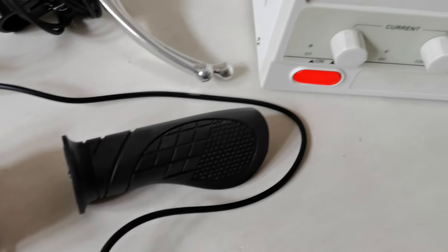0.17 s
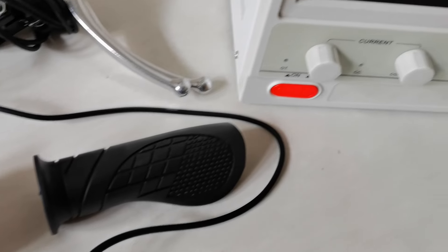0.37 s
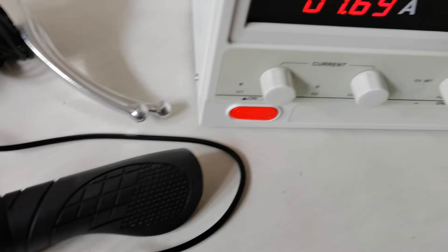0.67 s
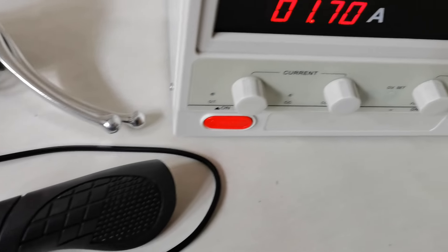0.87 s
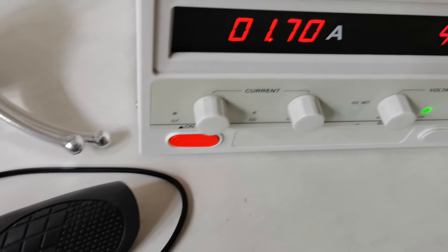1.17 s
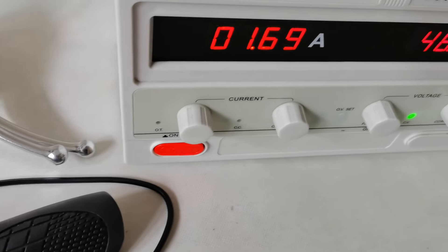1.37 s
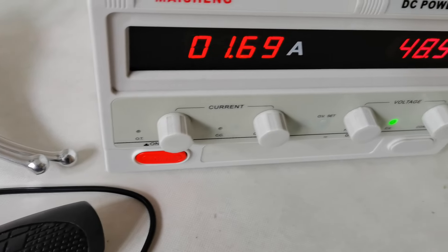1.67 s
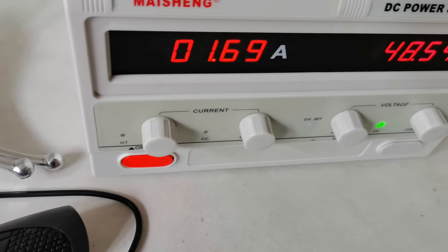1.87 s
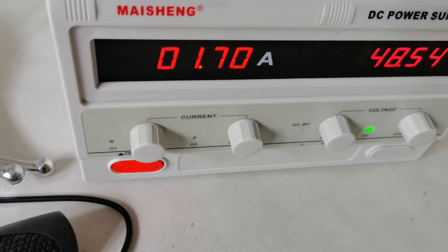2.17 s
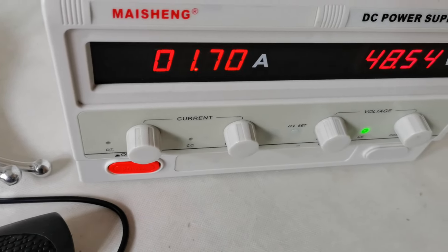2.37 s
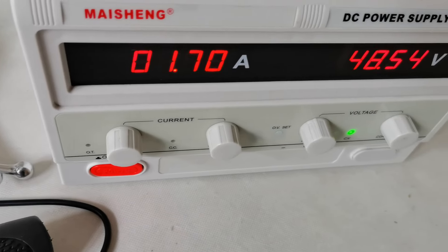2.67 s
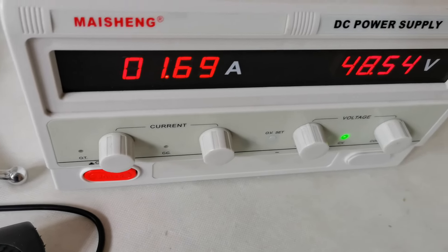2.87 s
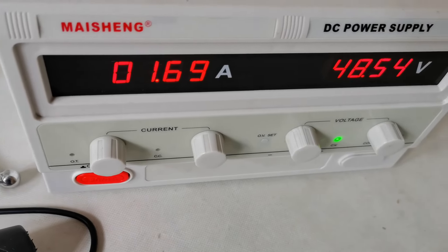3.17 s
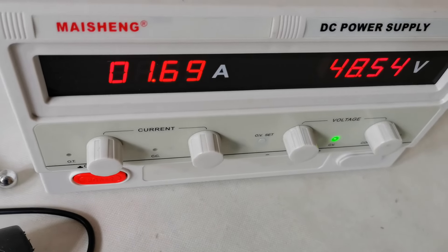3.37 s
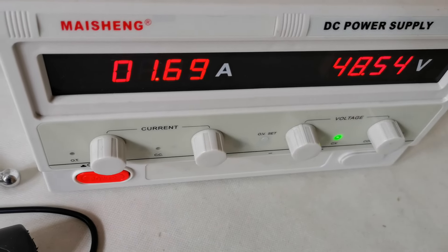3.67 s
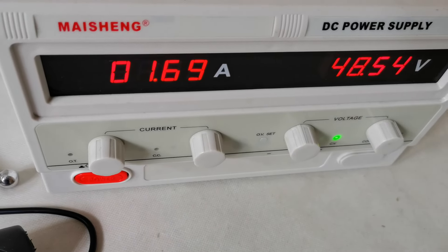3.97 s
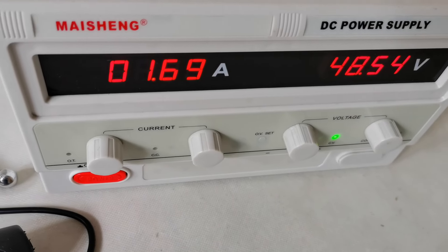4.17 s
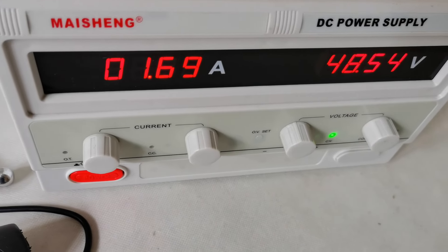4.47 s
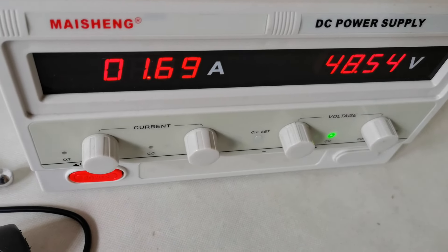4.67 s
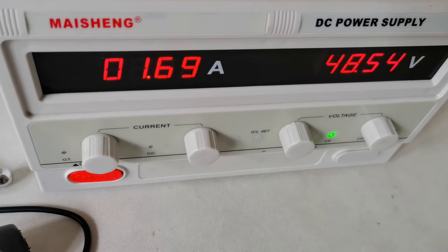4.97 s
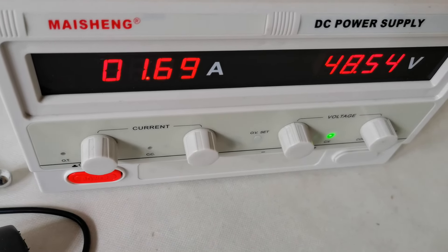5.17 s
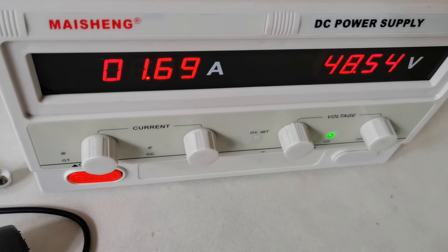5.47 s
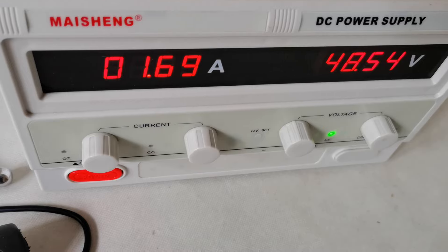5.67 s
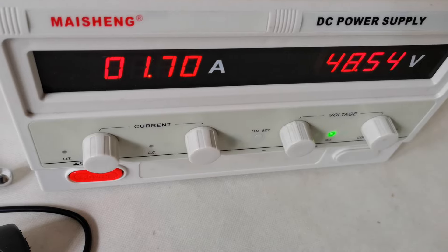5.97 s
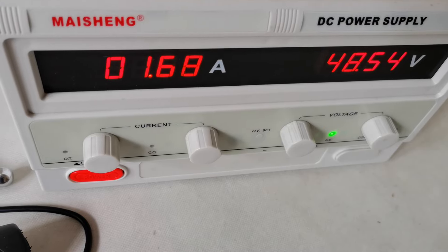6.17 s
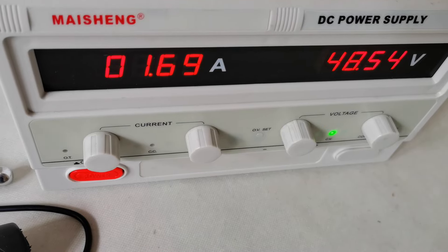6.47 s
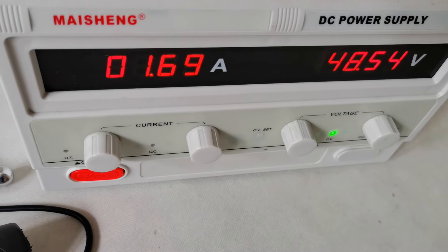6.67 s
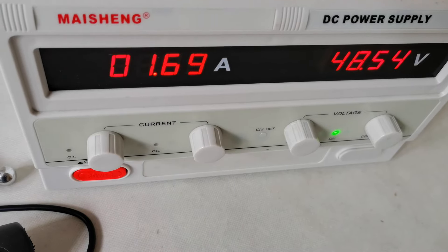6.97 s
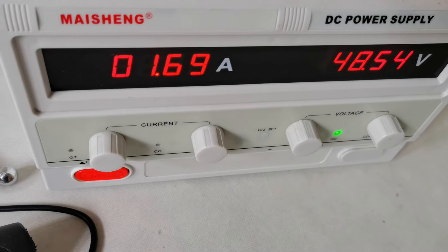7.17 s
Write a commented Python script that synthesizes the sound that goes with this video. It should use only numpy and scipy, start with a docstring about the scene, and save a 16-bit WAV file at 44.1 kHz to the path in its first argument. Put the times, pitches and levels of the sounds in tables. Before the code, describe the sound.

From 0 seconds a brushless hub motor is already running at full, unchanging speed on a bench indoors, left of the handheld stereo microphone. A piercing whine near 8.6 kHz sits over a stack of thinner buzzing tones from roughly 400 Hz upward, many around 1 to 4 kHz. The high whine throbs about 9.4 times a second, once per turn, its depth wavering slightly. Bearings add fuzzy, grainy tones and fine hiss; moving air and the bench make a broad rush mostly below 2 kHz. From 0 to about 3.1 seconds the microphone swings, gently changing timbre and stereo balance. At about 1.7 seconds a very short, soft low knock lands on the microphone body. From 3.1 until the end near 7.4 seconds the position is fixed: the same whine, flutter, hiss and rush persist, brighter on the left, without slowing or stopping.

```python
"""Hub motor on a bench

A brushless hub motor with 46 magnet poles runs at a steady speed on a bench, off to the left.
Its whine is a set of whole shaft orders that throbs once a turn; the bearings add fuzzy tones and hiss,
moving air and the bench a broad low rush. The hand-held stereo microphone swings round for three
seconds, then rests; during the swing a soft low knock lands on its body."""
import sys
import numpy as np
from scipy import signal
from scipy.fft import rfft, irfft, next_fast_len
from scipy.io import wavfile
from scipy.ndimage import map_coordinates

SR = 44100
rng = np.random.default_rng(int(sys.argv[2]) if len(sys.argv) > 2 else 0)


def decibels_to_gain(level_db):
    """Convert a level in decibels to a linear amplitude gain (20 dB per decade)."""
    exponent = np.asarray(level_db, float) / 20
    return 10 ** exponent


def waveform_to_disk(signal):
    """Save audio, clipped to [-1, 1], as 16-bit WAV at the path in sys.argv[1]."""
    frames = np.transpose(np.atleast_2d(signal))
    scaled = np.clip(frames, -1, 1) * 32767
    samples = np.round(scaled).astype(np.int16)
    wavfile.write(sys.argv[1], SR, samples)


N = 322812
POLES = 46
LEFT_LEAD_S = 0.0003856  # the left port is nearer the motor; the swing shortens this at first


def read(points, hz):
    """Columns of a table at hz, joined on a log-frequency axis."""
    table_hz, *columns = np.transpose(points)
    return np.array([np.interp(np.log(hz + 1), np.log(table_hz + 1), column) for column in columns])


def wander(top_hz):
    """Slow chance of rms 1: white noise low-passed at top_hz, with one second of run-in dropped."""
    lowpass = signal.butter(2, top_hz, fs=SR, output="sos")
    slow = signal.sosfilt(lowpass, rng.standard_normal(N + SR))[SR:]
    return slow / slow.std()


# Rotor speed on the bench: (time [s], speed [turns/s])
SPEED = [(0.7, 9.399), (1.7, 9.3982), (2.6, 9.3978), (3.6, 9.3986), (6.7, 9.3984)]


def turns():
    """Rotor angle in turns, the running sum of speed; zero at one early moment when the loud side
    faces the microphone."""
    loud_side_s = 0.128
    angle = np.cumsum(np.interp(np.arange(N) / SR, *np.transpose(SPEED))) / SR
    return angle - np.interp(loud_side_s * SR, np.arange(N), angle)


# How alike the two ports hear the noise: (frequency [Hz], likeness [0 to 1])
LIKENESS = [(30, .25), (60, 0.81), (120, 0.96), (250, 0.95), (500, 0.78), (900, 0.58), (1500, 0.8),
            (2100, 0.23), (3000, 0.19), (4500, 0.33), (6000, 0.084), (7200, 0.47), (8000, 0.31),
            (15000, 0.14)]


def noise(colour):
    """Two partly alike channels of noise with the given density; the shared part reaches the right later."""
    size = next_fast_len(N)
    hz = np.fft.rfftfreq(size, 1 / SR)
    left, other = rfft(rng.standard_normal((2, size)))
    same = np.clip(read(LIKENESS, hz)[0], 0, 1)
    late_left = left * np.exp(-2j * np.pi * hz * LEFT_LEAD_S)
    right = same * late_left + np.sqrt(1 - same ** 2) * other
    return irfft([left, right] * colour(hz) * np.sqrt(SR / 2), size)[:, :N]


# Moving air and bench rumble, before the swing colours them:
# (frequency [Hz], left density [dB per Hz], right density [dB per Hz])
RUSH = [(30, -86, -84), (45, -76, -77), (68.5, -70, -74.5), (101, -76, -77.5), (210, -71, -71.5),
        (316, -77.5, -76.5), (375, -69.5, -72.5), (553, -74.5, -70.5), (578.4, -59, -64.5),
        (860, -57.5, -58.5), (968, -73.5, -70), (1364, -71.5, -66.5), (1510, -64, -65), (1992, -74, -68),
        (2356, -76, -81.5), (2960, -84, -86)]


def rush():
    """Broad low noise of moving air and bench, whose level wanders a little."""
    swell_db, swell_hz = 0.29, 1.6  # rms, top rate
    low = noise(lambda hz: decibels_to_gain(read(RUSH, hz)) * (hz > 18) * (hz < RUSH[-1][0]))
    return low * decibels_to_gain(swell_db * wander(swell_hz))


# Knock on the microphone body: (start [s], left envelope peak [dB], frequency [Hz], length [s])
THUMP = [(1.696, -30, 50, 0.043)]


def thump():
    """A soft low knock on the microphone body: a sine under a smooth hump, weaker at the right port."""
    out = np.zeros(N)
    for start_s, db, hz, length_s in THUMP:
        t = np.arange(0, length_s, 1 / SR)
        knock = np.hanning(len(t)) * np.sin(2 * np.pi * hz * (t - length_s / 2))
        out[round(start_s * SR):][:len(t)] += decibels_to_gain(db) * knock
    return out * decibels_to_gain([[0], [-6]])


# Colour of the hub shell on the pole harmonics, before the swing; also the hiss density:
# (frequency [Hz], left density [dB per Hz], right density [dB per Hz])
SHELL = [(2318, -72, -73.5), (3000, -74.5, -79.5), (3780, -80.5, -73.5), (4270, -72, -84.5),
         (5003, -85, -77), (4770, -95, -95), (5350, -100, -101), (5753, -74, -77), (6200, -79.5, -109),
         (6620, -78.5, -98), (7110, -62, -65.5), (7240, -68.5, -58.5), (7590, -83, -94), (8705, -71, -96),
         (8580, -55, -69), (9400, -78, -88), (10400, -98, -90), (10350, -85, -86), (11600, -77.5, -86),
         (13400, -97.5, -92), (14000, -80.5, -84.5), (15100, -90.5, -94)]
# Valleys between the pole harmonics: (frequency [Hz], depth [dB])
VALLEYS = [(2800, 5.5), (3300, 8.5), (3700, 10), (4100, 9), (4500, 14), (5000, 10), (5700, 14.5),
           (6500, 3.5)]


def shell(hz):
    """Colour of the hub shell in dB, with a valley halfway between each two pole harmonics."""
    between = np.sin(np.pi * hz / (POLES * SPEED[-1][1])) ** 4
    return read(SHELL, hz) - read(VALLEYS, hz) * between


def hiss():
    """Bearing hiss through the hub shell: noise with the shell's colour, above the rush."""
    return noise(lambda hz: decibels_to_gain(shell(hz)) * (hz >= RUSH[-1][0]))


# Balls passing one spot of the race, before the swing:
# (order [per shaft turn], left level [dB], right level [dB], left lead [radians])
BALL_PASSES = [(7.5, -60.5, -60, -0.66), (15.21, -61, -61, 0.2)]
# Shifts of a pole tone by the rolling balls: (shift [shaft orders])
BALL_OFFSETS = [7.4, -8.22, 14.75, -14.21]
# Level for each of those shifts, over the shell colour: (level [dB])
BALL_SIDE_DB = [15.3, 12.4, 11, 9.9]
# Added level for each shifted pole multiple, from the 15th up: (level [dB])
BALL_POLE_DB = [-3, 4, -2, 0, 8, 1, -9]


def ball_tones():
    """The ball passes, and each high pole tone shifted by the balls, coloured by the shell."""
    rows = list(BALL_PASSES)
    for multiple, pole_db in enumerate(BALL_POLE_DB, start=15):
        for offset, side_db in zip(BALL_OFFSETS, BALL_SIDE_DB):
            order = multiple * POLES + offset
            hz = order * SPEED[-1][1]
            left_db, right_db = shell(hz) + side_db + pole_db
            rows.append((order, left_db, right_db, 2 * np.pi * hz * LEFT_LEAD_S))
    return rows


def balls(angle):
    """Each tone is narrow noise around its order, as the balls slip in the races."""
    width_hz, hop = 13, 64  # resonance width, samples between slip values
    decay = np.exp(-np.pi * width_hz / SR) ** hop
    two_poles = np.convolve([1, -decay], [1, -decay])
    out = np.zeros((2, N))
    for order, left_db, right_db, lead in ball_tones():
        count = N // hop + 2
        slip = rng.standard_normal(count) + 1j * rng.standard_normal(count)
        slip = signal.lfilter([1], two_poles, slip)
        slip = np.interp(np.arange(N) / hop, np.arange(count), slip / slip.std())
        tone = np.sqrt(2) * slip * np.exp(2j * np.pi * order * angle)
        out += decibels_to_gain([[left_db], [right_db]]) * [tone.real, (tone * np.exp(-1j * lead)).real]
    return out


# Parts of the shell's ring that point one way and sweep round:
# (from [Hz], to [Hz], swell up and down [dB], delay after the loud side [turns])
SWEEPS = [(6830, 7170, 5.5, 0.53), (8600, 9600, 2.5, 0.012)]


def sweep(x, angle):
    """Each pointing band is louder as its side of the rotor comes round."""
    size = next_fast_len(N)
    hz = np.fft.rfftfreq(size, 1 / SR)
    spectrum, out = rfft(x, size), x.copy()
    for low_hz, high_hz, swell_db, late in SWEEPS:
        band = irfft(spectrum * ((hz > low_hz) & (hz < high_hz)), size)[:, :N]
        gain = decibels_to_gain(swell_db * np.cos(2 * np.pi * (angle - late)))
        out += band * (gain - 1)
    return out


# Magnets passing, halves from unequal magnet pairs; levels before the swing:
# (multiple [of the pole count], left level [dB rms], right level [dB rms], left lead [radians],
# next order either side [dB over the tone])
POLE_TONES = [(1, -54, -57, 1.0, -20), (5, -67, -61, 3.1, -15), (6, -45, -47, -0.1, -13),
              (7, -52, -53, 2.3, -15), (8, -44, -48, 1.8, -20), (9, -48, -49, -2.2, -17),
              (10, -47, -48, 1.1, -16), (11, -52, -59, 0.1, -16), (13, -69, -68, 0.5, -2),
              (14, -56, -66, -2.3, -18), (15, -60, -73, -0.6, -15), (16, -44, -56, -0.7, -12),
              (17, -47, -45, 1.5, -12), (18, -55, -68, 0.4, -8), (19, -56, -67, -2.7, -8),
              (20, -32, -52, -2.6, -19), (21, -53, -80, -2.9, -13), (22, -63, -81, -1.8, -12),
              (23, -74, -70, -0.6, -12), (27, -62, -66, -1.2, -15), (7.5, -63, -58, 2.9, -15),
              (13.5, -61, -65, -1.9, -15), (15.5, -57, -61, -1.1, -15), (17.5, -59, -62, -1.1, -3),
              (18.5, -53, -76, 1.3, -10), (19.5, -59, -85, 3.0, -12), (20.5, -55, -73, -2.0, -10),
              (21.5, -60, -87, -2.5, -10), (25.5, -61, -65, 1.6, -10), (26.5, -62, -74, 0.4, -10)]
# Other strong shaft orders: some likely from the stator slots, some neighbours of pole harmonics;
# levels before the swing:
# (order [per shaft turn], left level [dB rms], right level [dB rms], left lead [radians],
# next order either side [dB over the tone])
OTHER_TONES = [(22, -60, -60, 0.5, -20), (101, -49, -44, 2.5, -20), (103, -41, -42, 2.0, -10),
               (152, -52, -57, -3.1, -20), (154, -49, -51, 2.7, -20), (178, -52, -46, -1.8, -9),
               (190, -53, -57, 2.5, -4), (304, -48, -44, 1.3, -21), (308, -49, -44, 1.4, -22),
               (326, -60, -61, 2.0, -8), (359, -60, -59, -3.1, -8), (380, -58, -56, 1.4, -18),
               (404, -61, -63, -1.1, -12), (412, -61, -55, -2.1, -12), (424, -63, -65, 1.2, -5),
               (494, -64, -63, 1.9, -3), (514, -69, -60, 0.5, -12), (446, -51, -53, 0.2, -20),
               (454, -60, -62, 2.6, -8), (461, -51, -60, -0.6, -9), (468, -58, -54, 2.6, -18),
               (752, -53, -63, 0.5, -10), (765, -52, -63, -2.4, -10), (776, -45, -45, 2.3, -12),
               (781, -46, -50, 1.3, -7), (783, -46, -55, 0.6, -14), (788, -46, -57, 0.3, -10),
               (799, -52, -58, 2.8, -5), (913, -47, -68, -1.1, -5), (919, -39, -65, -2.7, -5),
               (923, -51, -68, -1.5, -1), (936, -49, -68, -1.1, -7), (940, -54, -71, -0.5, -12),
               (950, -47, -71, 2.0, -9), (1172, -61, -71, 1.4, -12), (1218, -61, -75, 2.2, -12),
               (1119, -68, -66, -2.5, -12), (1135, -68, -65, 0.9, -10), (1266, -69, -72, 0.6, -10),
               (1313, -70, -67, 1.0, -12), (1398, -69, -69, 2.5, -5), (1453, -65, -74, 2.6, -8)]


def whine(angle):
    """One turn of the rotor as a sum of whole shaft orders, read at the rotor angle."""
    size = 2 ** 15  # points in one turn
    order = np.arange(size // 2 + 1)
    hz = order * SPEED[-1][1]
    phase = 2 * np.pi * rng.random((2, len(order)))

    # every order within the shell's range, 2.3 to 15.1 kHz, sounds faintly, with its colour
    faint_db, scatter_db, spread = 5.0, 5, 1.66  # spread [radians] between the ports
    over_db = faint_db + scatter_db * np.minimum(rng.standard_normal(len(order)), 1.6)
    phase[1] = phase[0] - 2 * np.pi * hz * LEFT_LEAD_S + spread * rng.standard_normal(len(order))
    line = decibels_to_gain(shell(hz) + over_db) * np.exp(1j * phase)
    line[:, (hz < SHELL[0][0]) | (hz > SHELL[-1][0])] = 0

    # an uneven air gap ties the neighbours of the loudest harmonic to it: they swell together once a turn
    loud_order = 920  # the pole harmonic on the shell's strongest resonance
    gap_twist = 1.3  # radians: the gap also hurries and drags the tone, which skews the swell
    off = np.arange(-2, 3)
    phase[0, loud_order + off] = phase[0, loud_order] + gap_twist * off * (off + 1) / 2

    tones = [(round(POLES * multiple), *rest) for multiple, *rest in POLE_TONES] + OTHER_TONES
    flanks = [(k + step, left_db + side_db, right_db + side_db, lead, side_db)
              for k, left_db, right_db, lead, side_db in tones for step in (-1, 1)]
    # listed tones come last, so they replace any flank on the same order
    for k, left_db, right_db, lead, _ in flanks + tones:
        line[:, k] = decibels_to_gain([left_db, right_db]) * np.exp(1j * (phase[0, k] - np.array([0, lead])))

    # the neighbours of the pole tones waver, so the throb varies in depth
    beside = np.isin(order % POLES, (1, POLES - 1))
    one_turn = irfft(np.concatenate([line * ~beside, line * beside])) * size / np.sqrt(2)
    judder_turns, waver_db = 0.000015, 2.5  # both rms
    position = (angle + judder_turns * wander(25)) % 1 * size
    out = np.array([map_coordinates(side, [position], order=3, mode="grid-wrap") for side in one_turn])
    steady, wavering = out[:2], out[2:]
    return steady + wavering * decibels_to_gain(waver_db * wander(1.3))


# Colour added by the swing. The start colour fades to nothing by halfway; the halfway colour counts
# half at either end and one and a half times halfway:
# (frequency [Hz], left start [dB], right start [dB], left halfway [dB], right halfway [dB])
SWING_COLOUR = [(50, 3.5, 3.5, -0.5, 1.5), (300, 1, 0, 1.3, 0.5), (740, -1, -1, -2, -0.7),
                (1010, -4, 1, 1, 0), (1810, 2.5, 1.5, .5, 1.14), (2670, -2.5, 6, -1, 1.5),
                (2680, 9, 2, -4, 1.5), (3420, -8.5, 3, 0.5, -0.5), (3950, 3.5, -8, -0.5, -1.5),
                (4080, -0.5, 10, -4, 4), (4770, 1.5, -2.5, 1, -2.5), (6260, 1.5, 1, -6.5, 2),
                (6900, -4, -6, 0, 3), (7450, 2.5, -4, 3, -7), (8100, -1, -1.5, 0.5, 1),
                (8600, -1.5, 3, -1.1, -6), (10700, 2, 3, -1.5, 1.5), (14000, 0, -1, 0.5, -1.5)]


def swing(x):
    """Turning the microphone changes the colour at each port and the delay between them."""
    swing_end_s = 3.1  # the hand turns evenly until then
    facing_s, lead_short_ms = 2.54, 0.17  # the left lead starts short and is full by facing_s
    hz, t, z = signal.stft(x, SR, nperseg=1024, noverlap=768)
    position = 2 * np.minimum(t / swing_end_s, 1)  # 0 start, 1 halfway, 2 at rest
    short_ms = lead_short_ms * np.maximum(1 - t / facing_s, 0)
    colour = read(SWING_COLOUR, hz)[:, :, None]
    start_db = colour[:2] * np.maximum(1 - position, 0)
    halfway_db = colour[2:] * (1.5 - abs(1 - position))
    z *= decibels_to_gain(start_db + halfway_db)
    z[0] *= np.exp(-2j * np.pi * hz[:, None] * short_ms / 1000)
    return signal.istft(z, SR, nperseg=1024, noverlap=768)[1][:, :N]


def scene():
    """Motor, bearings and air, heard by the swinging microphone, with the knock on its body."""
    angle = turns()
    bearings = sweep(balls(angle) + hiss(), angle)
    return swing(whine(angle) + bearings + rush()) + thump()


def roll_off(x):
    """The treble ends steeply here."""
    return signal.sosfilt(signal.butter(12, 15180, fs=SR, output="sos"), x)


def record(dry):
    """The finished mix, as it is kept."""
    return roll_off(dry)


dry = scene()
out = record(dry)
waveform_to_disk(out)
```